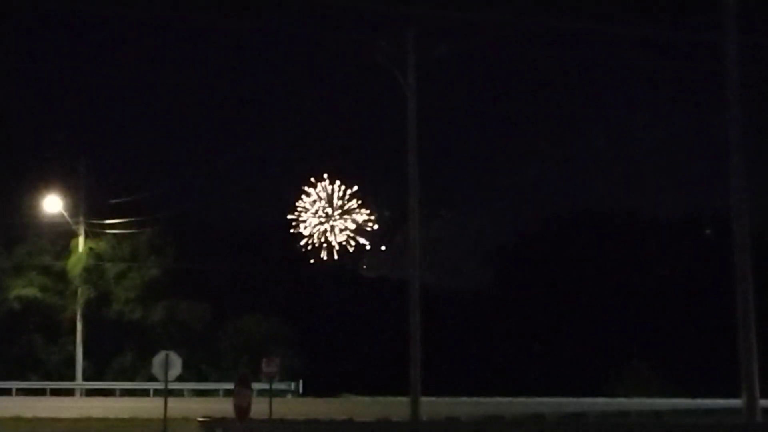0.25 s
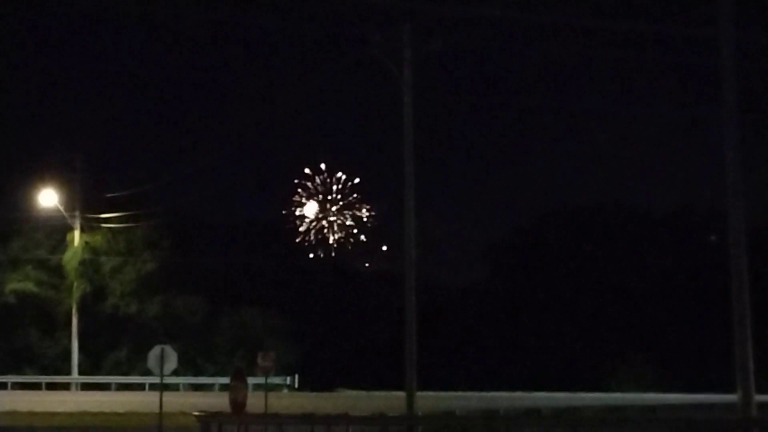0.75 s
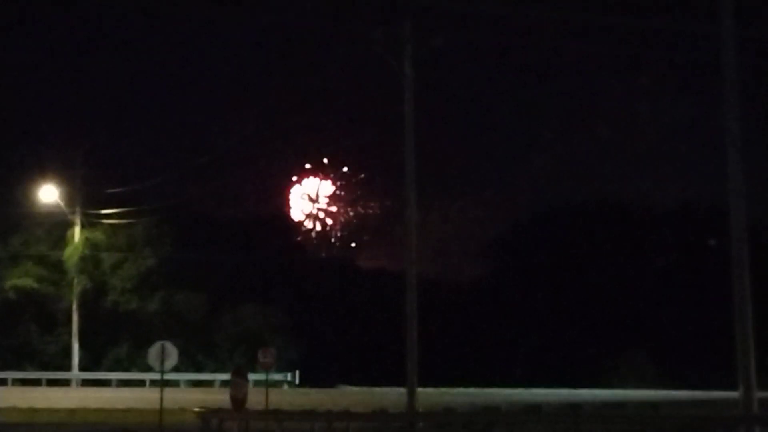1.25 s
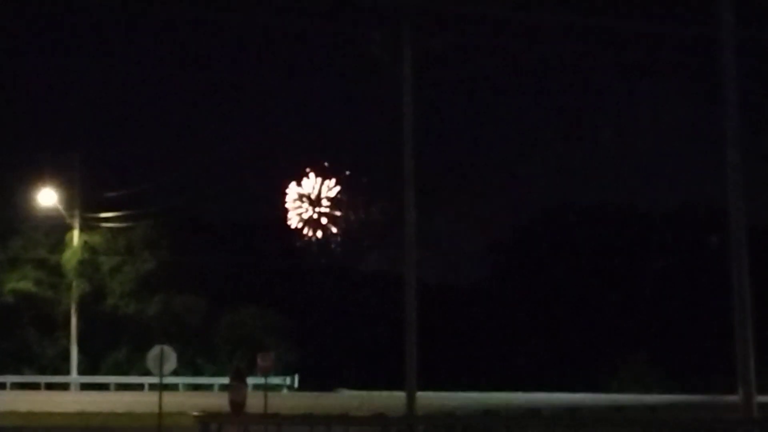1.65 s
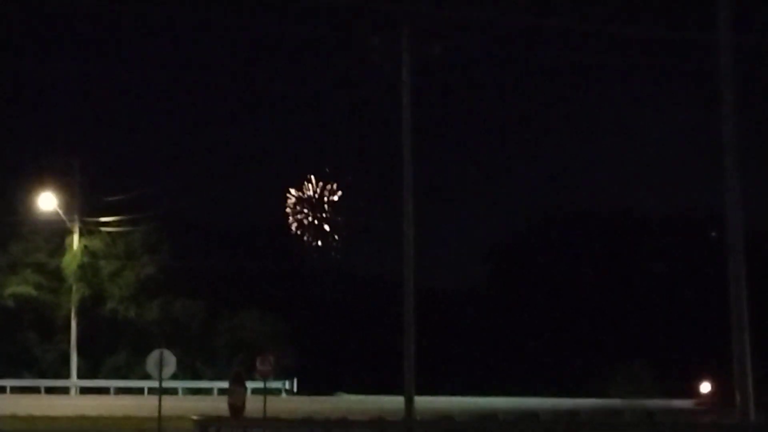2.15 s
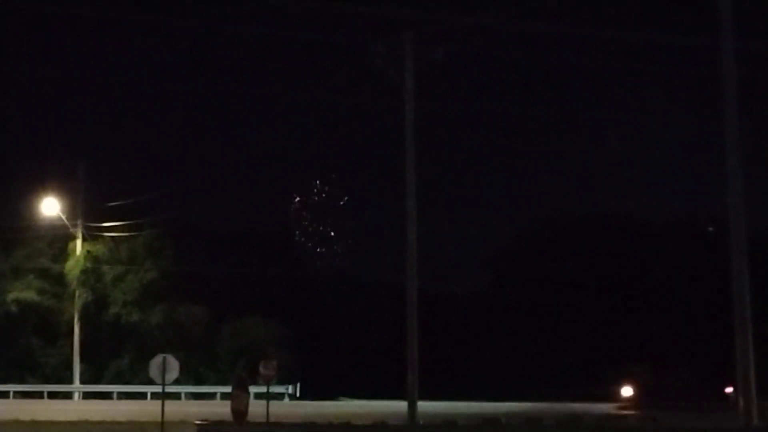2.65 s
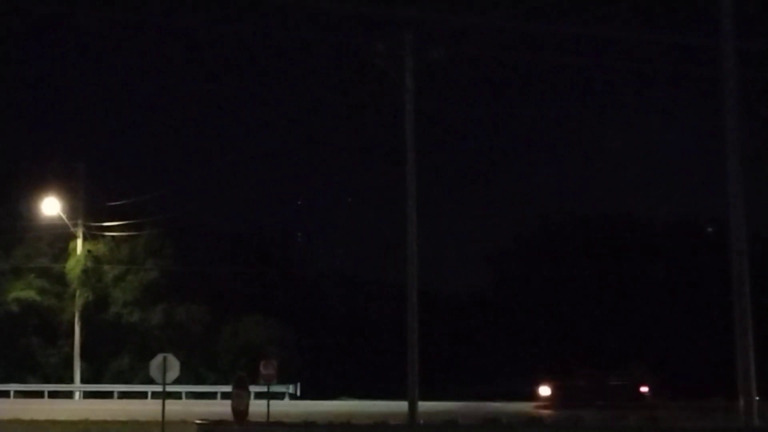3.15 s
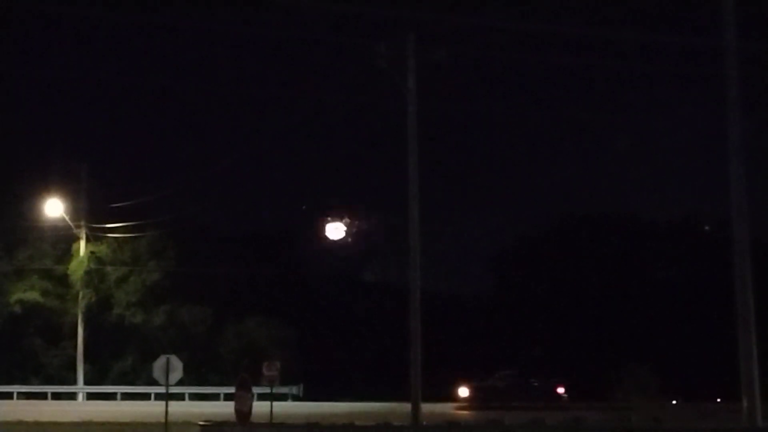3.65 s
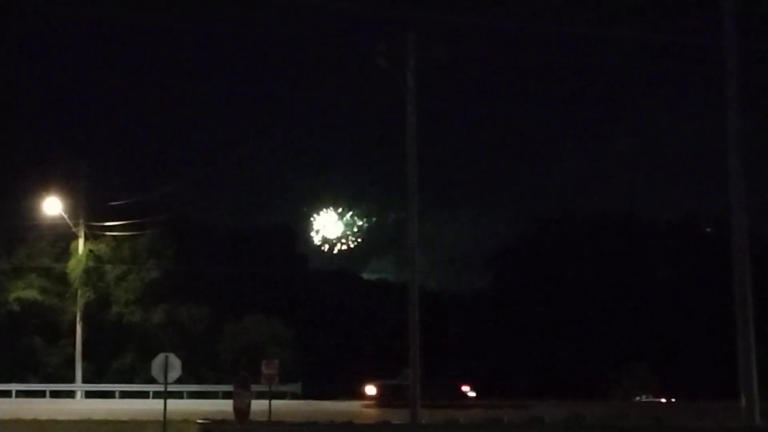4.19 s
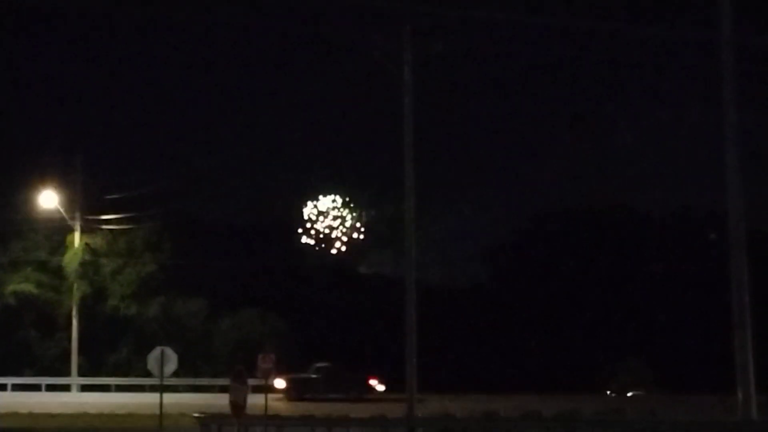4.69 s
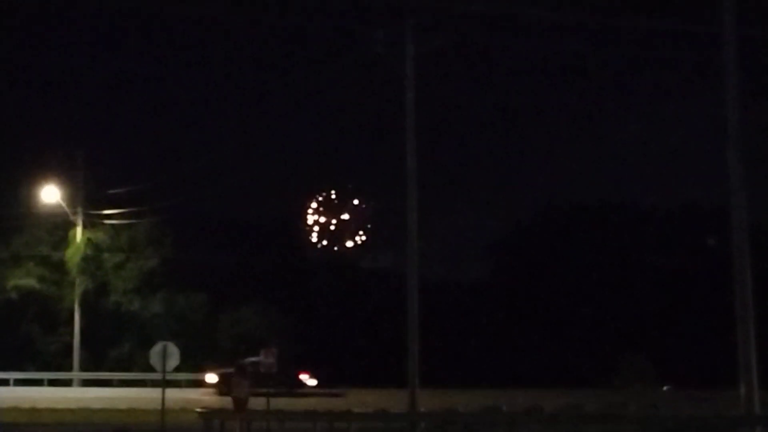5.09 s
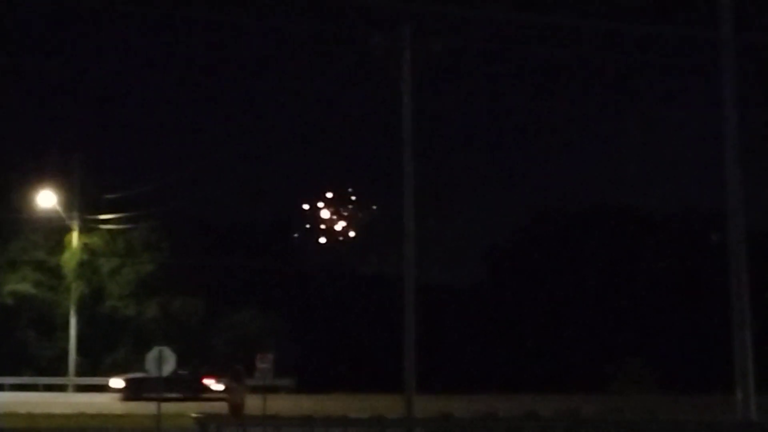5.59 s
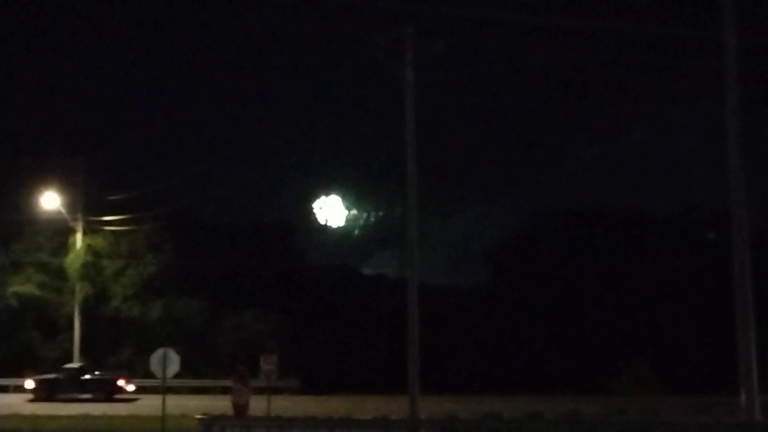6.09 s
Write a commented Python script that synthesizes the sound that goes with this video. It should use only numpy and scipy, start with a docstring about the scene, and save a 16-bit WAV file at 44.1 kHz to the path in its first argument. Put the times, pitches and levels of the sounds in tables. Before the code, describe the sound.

Far-off fireworks thud, snap and crackle irregularly at a night roadside, each boom trailing a low roll while cars hum softly beneath.

```python
"""Beside a road at night: firework shells burst far off, heard through one small microphone.
Each burst arrives as an N-shaped pressure wave with its ground bounce, rasps and scatters off nearby trees,
comes back as an echo and rolls on over the land. Weaker cracks and dull thuds are N-waves too; stars pop at
random, and short noise bursts tick sharply or rustle on after cracks.
Under it lie shaped noise for the traffic rumble and tyre hiss, and wavering tones for three engines."""
import sys
import numpy as np
from scipy import signal
from scipy.fft import rfft, irfft, next_fast_len
from scipy.io import wavfile
from scipy.ndimage import map_coordinates

SR = 44100
rng = np.random.default_rng(int(sys.argv[2]) if len(sys.argv) > 2 else 0)


def wav_record(signal):
    """Record a signal, one row per channel, as 16-bit PCM in the file named by sys.argv[1]."""
    frames = np.transpose(np.atleast_2d(signal))
    bounded = np.clip(frames, -1, 1)
    # unit amplitude maps onto the largest positive 16-bit level
    quanta = np.round(bounded * 32767).astype(np.int16)
    wavfile.write(sys.argv[1], SR, quanta)


N = 279277  # samples

# Far traffic rumble before its swell: frequency_hz, density_db (power per Hz)
RUMBLE_SPECTRUM = [(20, -49.5), (45, -56), (75, -54.5), (110, -58.5), (160, -60.5), (200, -69.5),
                   (260, -65.5), (400, -85), (800, -110)]
# Swell of the far traffic: time_s, gain_db
RUMBLE_SWELL = [(0, -4.5), (1.5, -8), (2.8, -9), (3.3, -7.5), (4.4, -9), (5.2, -1.5), (5.8, -9), (6.33, -3)]
# Tyre hiss before its swell: frequency_hz, density_db (power per Hz)
TYRE_SPECTRUM = [(200, -100), (420, -85.5), (650, -82.5), (950, -81), (1300, -84.5), (1700, -87.5),
                 (2200, -91), (2600, -94.5), (2950, -96), (3400, -101), (4200, -100), (5000, -100.5),
                 (6400, -111), (7700, -114)]
# Swell of the tyre hiss: time_s, gain_db
TYRE_SWELL = [(0, 1.3), (1.1, 0.3), (1.6, -0.1), (2.8, -0.1), (3.3, 1.3), (4.2, -0.3), (5, 0.6),
              (6.33, 0.35)]
# Nearer car, which holds its speed, then pulls away: time_s, firing_hz, level_db (before waver and throb)
NEAR_ENGINE = [(0, 90.46, -42.5), (.7, 89.45, -45), (2.1, 91.2, -38), (2.6, 92.4, -44.5),
               (3.05, 95.8, -42.5), (4.5, 98.06, -44.5), (6.33, 104.7, -49)]
# Second car, passing at a nearly steady speed: time_s, firing_hz, level_db (before waver and throb)
PASSING_ENGINE = [(0, 78.93, -59), (2.2, 77.9, -60.5), (2.9, 78.76, -47), (4.6, 78.4, -44.5),
                  (6.33, 74.1, -67.5)]
# Fainter, higher engine that comes and goes: time_s, firing_hz, level_db (before waver and throb)
FAR_ENGINE = [(1.1, 118, -64), (1.9, 118.2, -50), (3, 118.4, -68), (3.6, 119.6, -68)]
THROB_DB = 2.4  # spread of an engine's strength

# Colour of a long path over the ground: frequency_hz, width_hz, gain_db (in full for long waves only)
PATH_COLOUR = [(279, 240, 6.5), (449.5, 556, -22.5), (608, 478, 25), (1730, 340, 2)]
GROUND_HZ = 1720  # low-pass corner of the ground bounce
AIR_HZ = 4760     # low-pass corner for the shortest waves; long ones get down to half of it

# Short rasp of a shock front off the leaves: frequency_hz, gain_db
RASP_COLOUR = [(400, -27.5), (800, -5), (1200, -2), (1950, -4.5), (2600, -3.5), (5000, -10.5)]
RASP_T60_S, SHELL_RASP_DB, CRACK_RASP_DB = 0.022, -3, -7
# Scatter from leaves and poles, mostly highs: frequency_hz, gain_db
SCATTER_COLOUR = [(100, -6.5), (400, -4), (900, -5.5), (1700, -1.5), (3500, -3), (6500, -3)]
SCATTER_T60_S, SCATTER_DB = 0.12, -5
# Roll sent back by the land: frequency_hz, gain_db
ROLL_COLOUR = [(40, -22), (90, -7), (170, 2.5), (260, -0.5), (380, -3), (500, 5), (600, 1), (740, 5),
               (950, -10), (2000, 3), (5000, -9.5)]
ROLL_T60_S, ROLL_DB, ROLL_ONSET_S, ROLL_LUMPS_DB = 1.89, -4.5, 0.022, 2.5

# Short noise bursts, sharp ticks and longer rustling tails after cracks:
# start_s, level_db (at the start), pitch_hz, width_hz (of one filter pass), t60_s
NOISE_BURSTS = [(.524, -40, 3680, 1500, 0.013), (0.532, -43, 1650, 1600, 0.11),
                (.546, -54, 3500, 1800, 0.034), (0.657, -41, 2660, 1500, 0.011),
                (.658, -41, 3750, 700, 0.012), (0.748, -39.5, 4630, 500, 0.015),
                (0.746, -44, 2050, 1500, 0.019), (1.421, -41.5, 1930, 793, 0.022),
                (1.558, -38, 1629, 810, 0.018), (3.148, -47.5, 3602, 1450, 0.014),
                (3.284, -36, 3720, 400, 0.012), (3.282, -38.5, 4500, 400, .008),
                (3.3104, -41, 1306, 1190, 0.0088), (3.284, -33, 2000, 350, 0.012),
                (1.476, -41, 1800, 910, 0.018), (1.9, -49, 1150, 250, 0.11),
                (3.97, -44.5, 1540, 989, 0.076), (5.323, -37.5, 1000, 300, 0.041),
                (5.569, -45, 6870, 1212, 0.0082), (5.57, -41, 1790, 1211, 0.029),
                (5.571, -38.5, 1005, 300, 0.035)]
# Strength of the crackling stars, around which each star varies: time_s, level_db
STAR_LEVEL = [(0, -36), (1.2, -28.5), (2, -55), (3.3, -24), (4.5, -41.5), (6.33, -36)]
STARS_PER_S = 8.8

# Cracks and dull thuds, one of them the low body of a louder crack:
# start_s, level_db, wave_length_ms, bounce_lag_ms
CRACKS_AND_THUDS = [(.259, -16.5, 2.14, 2.2), (0.307, -17.5, 2.3, 1.5), (0.346, -18.5, 2.2, 2.8),
                    (.644, -17, 2.3, 2.64), (0.793, -17, 0.63, 3.3), (0.8199, -21.5, 0.83, 1.2),
                    (1.075, -15.5, 1.8, 2.36), (1.1025, -19.5, 1.03, 2.7), (1.1514, -11, 5.6, 6.2),
                    (1.192, -19, 2.6, 1.36), (2.2564, -14.5, 2.1, 4.2), (2.376, -14.5, 1.07, 2.73),
                    (2.511, -16.5, 1.86, 2.46), (2.624, -21, 1.06, 1.1), (2.773, -15, 3.8, 5),
                    (2.8241, -11.5, 3.7, 1.6), (3.0105, -8.5, 3.34, 2.44), (3.1465, -20.5, 0.91, 1.5),
                    (3.2835, -13.5, 0.99, 1.35), (3.3098, -20, 0.91, 0.86), (3.338, -25, 0.99, 2.5),
                    (3.5027, -15.5, 0.95, 1.9), (3.6965, -15.5, 1.4, 1.03), (3.763, -19.5, 1.44, 3.6),
                    (3.8403, -17, 1.1, 2.5), (3.8807, -21.5, 0.94, 1.2), (3.903, -17.5, 3, 0.52),
                    (3.9734, -13, 4.1, 1.8), (4.364, -19, 1.67, 2.3), (4.401, -22, 4.9, 0.55),
                    (5.1296, -10.5, 1.46, 1.5), (5.321, -10.5, 2.75, 4.5), (5.5707, -13, 4.3, 5.3),
                    (5.935, -14.5, 2.5, 1.74), (6.071, -19.5, 2.2, 1.8), (6.2033, -20, 3.4, 1.44)]
CRACK_REAR_DB = -6.5  # rear shock against the front one; stars use it too
# Two dulling corners in cycles per wave length: longer waves are duller and have a rounder front
CRACK_CORNER_CYCLES, CRACK_FRONT_CYCLES, CRACK_BOUNCE_SHARE = 0.3, 11, 0.54
# Far, weak bursts sound wetter: the roll follows only a share of the direct level
CRACK_ROLL_DB, ROLL_FOLLOWS = -13.5, 0.3

# Dull thuds of the big booms off far slopes and buildings: start_s, level_db (before dulling)
LATE_ECHOES = [(2.388, -13.5), (2.433, -16), (2.463, -26), (3.539, -14), (4.638, -10), (4.693, -13),
               (4.717, -14), (4.739, -10), (4.943, -17), (5.003, -10), (5.056, -14), (5.118, -6.5),
               (5.158, -18), (5.195, -13), (5.232, -16), (5.271, -17), (5.346, -21.5), (5.371, -13.5),
               (5.412, -20), (5.455, -26), (5.52, -25), (5.62, -23), (5.7, -25), (6.279, -22)]
ECHO_HZ = 900  # low-pass corner of echoes

# Shells: start_s, level_db, wave_length_ms, dulling_corner_hz, front_rounding_corner_hz,
# rear_against_front_db, bounce_lag_ms, bounce_share (0-1), echo_lag_ms, echo_db, roll_db
SHELLS = [(0.1753, -2, 1.87, 104, 1400, -11, 3.64, 0.56, 12, -25, -8),
          (0.2273, -5.5, 3.22, 169, 3500, 0, 2.53, 0.32, 11, -14, -6.5),
          (.5229, 5.5, 0.92, 113, 14000, -13.5, 0.4, 0.7, 21, -30, -13),
          (0.5824, .5, 1.73, 54.6, 1190, -6.5, 4.2, 0.5, 12, -19, -9),
          (0.9406, -12.5, 1.46, 266.4, 4630, -9.5, .85, 0.64, 54, -7.5, -10),
          (2.292, 5.5, 3.66, 56, 4000, -2, 1.32, 0.13, 35, -11, -0.5),
          (2.582, -15.5, 5.2, 186, 3000, 0, 1.2, 0.1, 43, -16, 3),
          (2.863, -20.5, 5.8, 400, 3930, 0.5, 1.55, 0.7, 34, -5, -3.5),
          (3.0095, 11, 1.04, 55, 13940, -5.5, 2.2, 0.18, 24, -22, -16.5),
          (3.4213, 5, 3.81, 56, 13800, 2.3, 2.88, 0.31, 30, -11.5, -0.5),
          (4.2244, -15.2, 5.37, 318, 14100, -0.5, 1.37, .43, 37, -5.5, -0.5),
          (4.524, 0.7, 4, 170, 13900, -1.5, 2.28, 0.58, 31, -11, 0),
          (4.592, .8, 5.46, 101, 14350, -9, 4, 0.37, 33, -5.5, -1.5),
          (4.8419, 2.5, 4.6, 114.4, 14200, -3, 4, 0.65, 51, -12, 1),
          (5.092, 4, 4.4, 77.5, 13700, -7, 3.94, 0.43, 46, -9, -1)]

# Microphone's uneven treble: frequency_hz, width_hz, gain_db
MIC_TREBLE = [(2120, 1100, 3), (2940, 240, 2), (3400, 730, 0), (4200, 1800, 3.5), (6720, 4100, -7.5)]
MIC_BASS_HZ, MIC_DAMPING = 108.3, 0.71  # bass resonance and its damping (1/Q)
MIC_LOW_HZ, MIC_TOP_HZ = 40, 7650       # high-pass and low-pass corners


def from_db(db):
    """Decibels to an amplitude factor."""
    return 10 ** (np.asarray(db) / 20)


def rms_one(x):
    """Scale a signal to an rms of 1."""
    return x / np.sqrt(np.mean(x ** 2) + 1e-20)


def in_time(rows):
    """The columns of a curve, sample by sample."""
    time_s, *columns = np.transpose(rows)
    return [np.interp(np.arange(N) / SR, time_s, column) for column in columns]


def add(out, start_s, sound):
    """Mix a sound in at a time."""
    at = int(np.clip(round(start_s * SR), 0, N - 1))
    out[at:at + len(sound)] += sound[:N - at]


def drift(rate_hz, size=N):
    """Slow random movement with rms 1: a smooth curve through random knots."""
    knots = rng.standard_normal(size)[:int(size / SR * rate_hz) + 2]
    position = np.arange(size) / SR * rate_hz
    return rms_one(map_coordinates(knots, [position], order=3, mode="nearest"))


def dulled(x, corner_hz):
    """One-pole low-pass."""
    return signal.lfilter(*signal.butter(1, min(corner_hz, 0.45 * SR), fs=SR), x)


def bell(x, hz, width_hz, gain_db):
    """Lift or sink one band with a resonant filter."""
    centre = 2 * SR * np.tan(np.pi * hz / SR)  # keeps the centre in place through the bilinear step
    half_gain = from_db(gain_db / 2)
    width = centre * width_hz / hz
    top = [1, width * half_gain, centre * centre]
    bottom = [1, width / half_gain, centre * centre]
    return signal.lfilter(*signal.bilinear(top, bottom, SR), x)


def coloured(x, spectrum):
    """Shape a noise by frequency and dB points, joined over log frequency."""
    hz, db = np.transpose(spectrum)
    size = next_fast_len(len(x) + SR // 10)
    bins = np.maximum(np.fft.rfftfreq(size, 1 / SR), 1)
    gain = from_db(np.interp(np.log(bins), np.log(hz), db))
    return irfft(rfft(x, size) * gain, size)[:len(x)]


def noise(spectrum):
    """Steady random noise with a given power per Hz."""
    return coloured(rng.standard_normal(N), spectrum) * np.sqrt(SR / 2)


def traffic():
    """Far rumble and the even hiss of tyres: two shaped noises that swell slowly."""
    rumble_db, = in_time(RUMBLE_SWELL)
    tyre_db, = in_time(TYRE_SWELL)
    rumble = from_db(rumble_db) * noise(RUMBLE_SPECTRUM)
    return rumble + from_db(tyre_db) * noise(TYRE_SPECTRUM)


def engine(track, waver=0.0148, octave_db=-22):
    """An exhaust note at the firing rate, wavering in pitch and strength, with a weak octave."""
    firing_hz, level_db = in_time(track)
    phase = 2 * np.pi * np.cumsum(firing_hz * (1 + waver * drift(11))) / SR
    note = np.sin(phase) + from_db(octave_db) * np.sin(2 * phase)
    return from_db(level_db + THROB_DB * drift(11)) * rms_one(note)


def echoes(t60_s, onset_s, per_s, lumps_db, size=2 * SR):
    """Many reflections in clumps that build up, then die away; total energy 1."""
    t = np.arange(size) / SR
    strengths = rng.standard_normal(size) * from_db(lumps_db * drift(45, size=size))
    arrives = rng.random(size) < per_s / SR
    fade = from_db(-60 * t / t60_s) * (1 - np.exp(-(t / onset_s) ** 2))
    train = strengths * arrives * fade
    return train / np.sqrt(np.sum(train ** 2) + 1e-20)


def roll(wave):
    """What the land sends back of a sound, by a fresh set of paths each time."""
    paths = echoes(ROLL_T60_S, ROLL_ONSET_S, per_s=2400, lumps_db=ROLL_LUMPS_DB)
    return from_db(ROLL_DB) * signal.fftconvolve(wave, coloured(paths, ROLL_COLOUR))[:N]


def scatter(wave):
    """The quick return from trees and poles, with fresh random paths each time."""
    paths = echoes(SCATTER_T60_S, onset_s=0.0065, per_s=3700, lumps_db=-1.0, size=SR // 2)
    return from_db(SCATTER_DB) * signal.fftconvolve(wave, coloured(paths, SCATTER_COLOUR))[:N]


def rasp(wave):
    """What the leaves send back of a shock front within a few hundredths of a second."""
    paths = echoes(RASP_T60_S, onset_s=0.0018, per_s=2100, lumps_db=-2.0, size=SR // 10)
    return signal.fftconvolve(wave, coloured(paths, RASP_COLOUR))


def blast(length_ms, corner_hz, rear_db, bounce_ms, bounce_share, size=2048):
    """An N-wave: pressure jumps up, falls through zero and jumps back; distance dulls it, the ground repeats it."""
    ms = np.arange(size) * 1000 / SR
    phase = np.minimum(ms / length_ms, 1)
    # the slope of this arch is the N; its tilt sets the rear shock against the front one
    arch = phase * (1 - phase) * from_db(rear_db * (phase - 0.5))
    wave = dulled(np.diff(arch, prepend=0) * length_ms / ms[1], corner_hz)
    bounce = np.interp(ms - bounce_ms, ms, wave, left=0)
    wave = wave + bounce_share * dulled(bounce, GROUND_HZ)
    # a wave stretches as it travels: the longer it is, the more ground and air have coloured it
    reach = min(length_ms / 3.9, 1)
    for hz, width_hz, gain_db in PATH_COLOUR:
        wave = bell(wave, hz, width_hz, gain_db * reach)
    air_hz = min(AIR_HZ / (1 + reach), 0.45 * SR)
    return signal.sosfilt(signal.butter(3, air_hz, fs=SR, output="sos"), wave)


def noise_bursts():
    """Decaying noise through one resonance each: brief ones tick sharply, longer ones rustle on after cracks."""
    out, t = np.zeros(N), np.arange(SR // 10) / SR
    for start_s, level_db, pitch_hz, width_hz, t60_s in NOISE_BURSTS:
        b, a = signal.iirpeak(pitch_hz, max(pitch_hz / width_hz, 1), fs=SR)
        once = signal.lfilter(b, a, rng.standard_normal(len(t)))
        grain = rms_one(signal.lfilter(b, a, once))
        add(out, start_s, from_db(level_db - 60 * t / t60_s) * grain)
    return out


def stars(typical_ms=0.85, corner_hz=700):
    """Tiny charges pop at random, each a short blast wave of random length and level."""
    level_db, = in_time(STAR_LEVEL)
    out, chance = np.zeros(N), rng.random(N)
    sizes = rng.uniform(-0.84, 1, (N, 2))  # one column for length, one for level
    for i in np.flatnonzero(chance < STARS_PER_S / SR):
        length_ms = typical_ms * np.exp(0.75 * sizes[i, 0])
        wave = blast(length_ms, corner_hz, CRACK_REAR_DB, bounce_ms=1.5, bounce_share=0.7)
        add(out, i / SR, from_db(level_db[i] + 4 * sizes[i, 1]) * wave)
    return out


def cracks_and_thuds():
    """N-waves with a faint rasp and roll: short ones crack, long ones thud, one as the low body of a louder crack."""
    direct, sent = np.zeros(N), np.zeros(N)
    for start_s, level_db, length_ms, bounce_ms in CRACKS_AND_THUDS:
        wave_hz = 1000 / length_ms
        corner_hz = CRACK_CORNER_CYCLES * wave_hz
        wave = blast(length_ms, corner_hz, CRACK_REAR_DB, bounce_ms, CRACK_BOUNCE_SHARE)
        wave = dulled(wave, CRACK_FRONT_CYCLES * wave_hz)
        add(direct, start_s, from_db(level_db) * wave)
        add(sent, start_s, from_db(CRACK_ROLL_DB + ROLL_FOLLOWS * level_db) * wave)
    return direct + from_db(CRACK_RASP_DB) * rasp(direct)[:N] + roll(sent)


def late_echoes():
    """Single dull returns that stand out of the roll, all copies of one long blast wave."""
    out = np.zeros(N)
    wave = blast(length_ms=3.4, corner_hz=101, rear_db=2, bounce_ms=4.5, bounce_share=0.26)
    for start_s, level_db in LATE_ECHOES:
        add(out, start_s, from_db(level_db) * wave)
    return dulled(out, ECHO_HZ)


def shells():
    """Each shell arrives directly, rasps and scatters in the trees, echoes once and rolls over the land."""
    out = np.zeros(N)
    for (start_s, level_db, length_ms, corner_hz, front_hz, rear_db,
         bounce_ms, bounce_share, echo_ms, echo_db, roll_db) in SHELLS:
        wave = from_db(level_db) * blast(length_ms, corner_hz, rear_db, bounce_ms, bounce_share)
        wave = dulled(dulled(wave, front_hz), front_hz)
        add(out, start_s, wave)
        add(out, start_s, from_db(SHELL_RASP_DB) * rasp(wave))
        add(out, start_s, scatter(wave))
        add(out, start_s + echo_ms / 1000, from_db(echo_db) * dulled(wave, ECHO_HZ))
        add(out, start_s, from_db(roll_db) * roll(wave))
    return out


def scene():
    """Road noise, the weaker bursts with their scatter off the trees, and the shells, in one channel."""
    road = traffic() + engine(NEAR_ENGINE) + engine(PASSING_ENGINE) + engine(FAR_ENGINE)
    weaker = late_echoes() + cracks_and_thuds() + stars() + noise_bursts()
    return (road + weaker + scatter(weaker) + shells())[None]


def record(dry):
    """The small microphone loses deep bass, so each blast swings back once more; uneven treble, top cut."""
    w = 2 * np.pi * MIC_BASS_HZ
    bass_loss = signal.bilinear([1, 0, 0], [1, MIC_DAMPING * w, w * w], SR)
    heard = signal.lfilter(*bass_loss, dry)
    heard = signal.sosfilt(signal.butter(2, MIC_LOW_HZ, "high", fs=SR, output="sos"), heard)
    for hz, width_hz, gain_db in MIC_TREBLE:
        heard = bell(heard, hz, width_hz, gain_db)
    # steep low-pass: 0.3 dB ripple, 70 dB down above the corner
    return signal.sosfilt(signal.ellip(8, 0.3, 70, MIC_TOP_HZ, fs=SR, output="sos"), heard)


dry = scene()
out = record(dry)
wav_record(out)
```